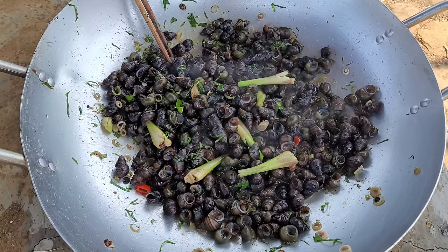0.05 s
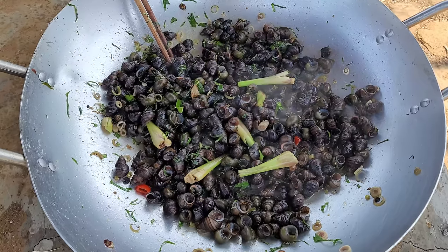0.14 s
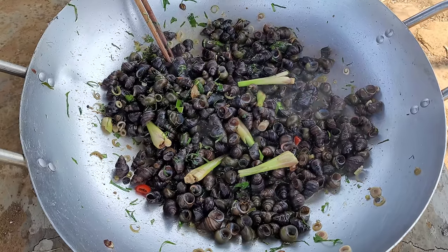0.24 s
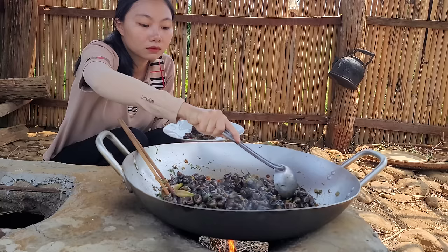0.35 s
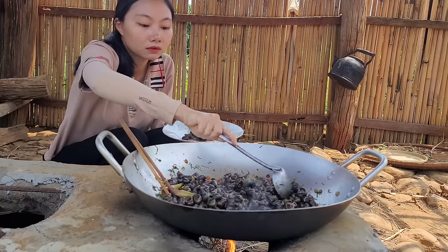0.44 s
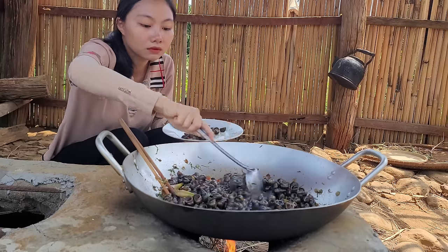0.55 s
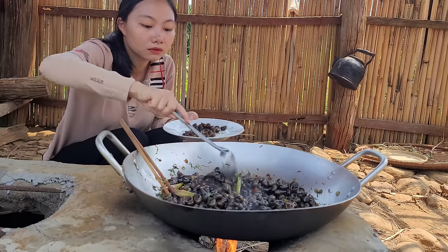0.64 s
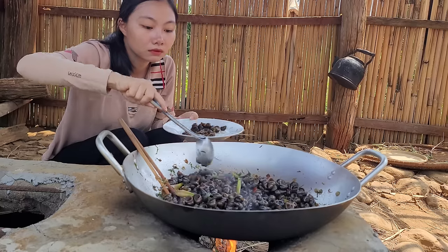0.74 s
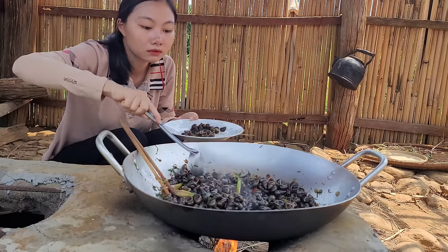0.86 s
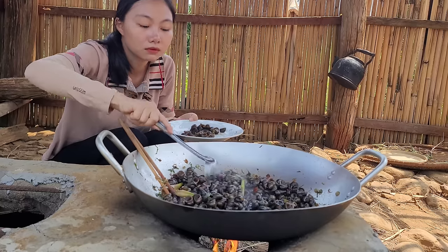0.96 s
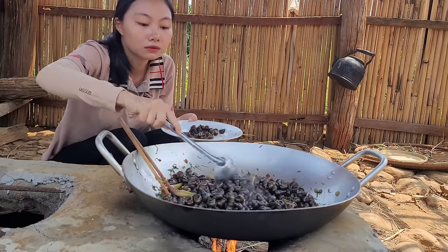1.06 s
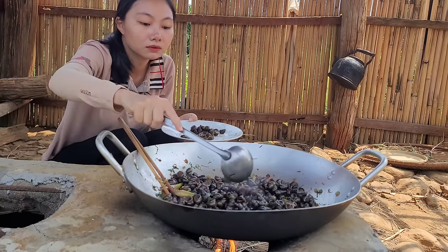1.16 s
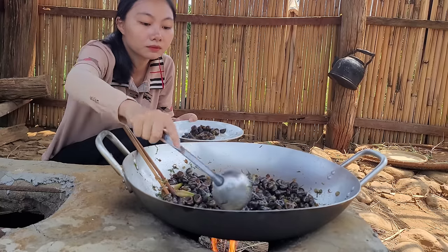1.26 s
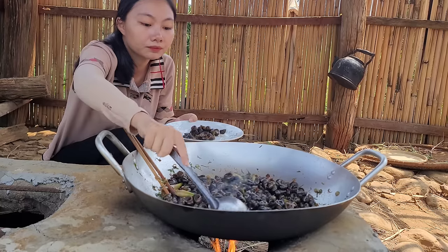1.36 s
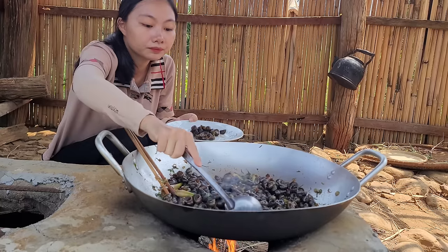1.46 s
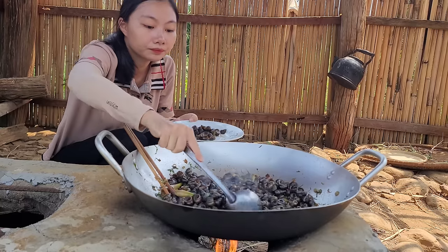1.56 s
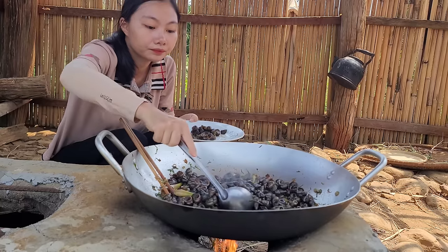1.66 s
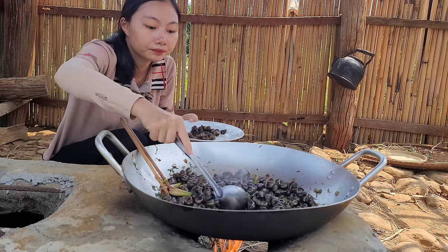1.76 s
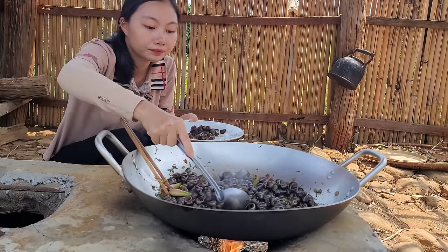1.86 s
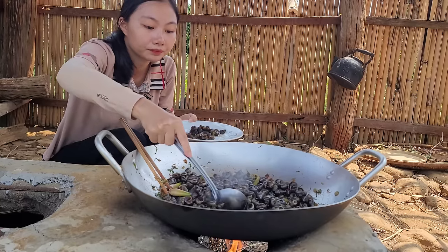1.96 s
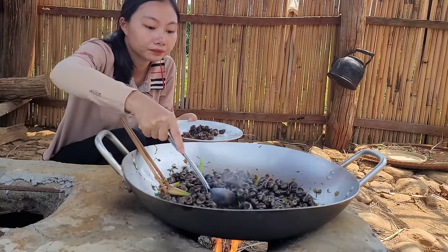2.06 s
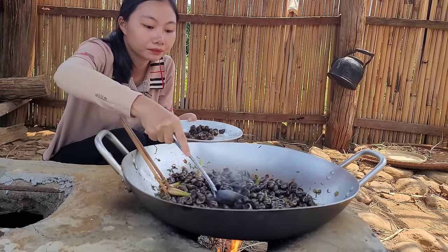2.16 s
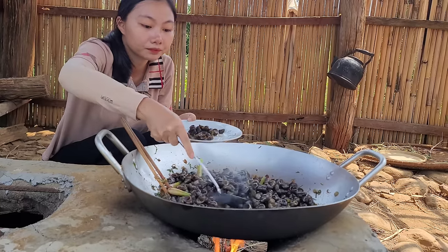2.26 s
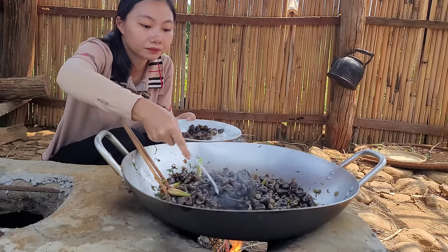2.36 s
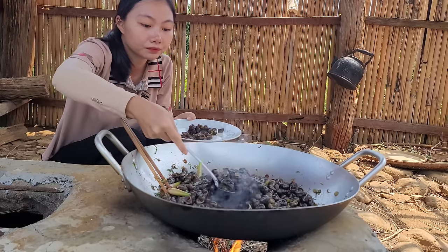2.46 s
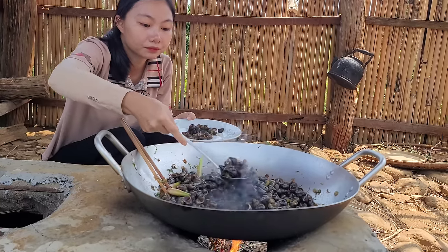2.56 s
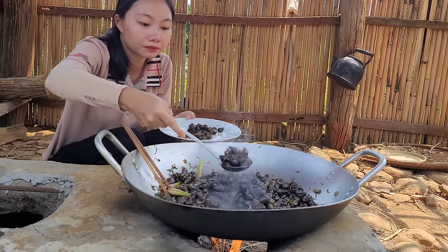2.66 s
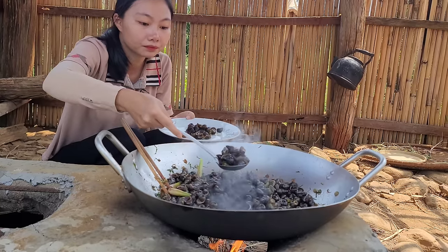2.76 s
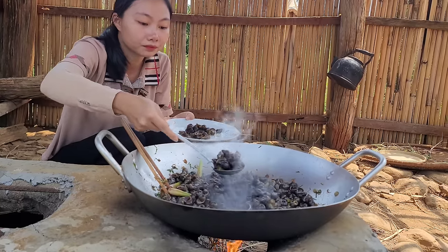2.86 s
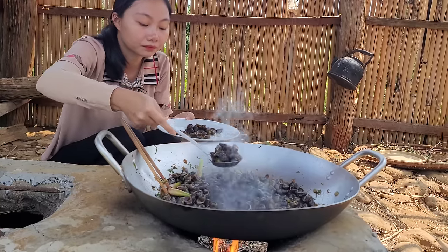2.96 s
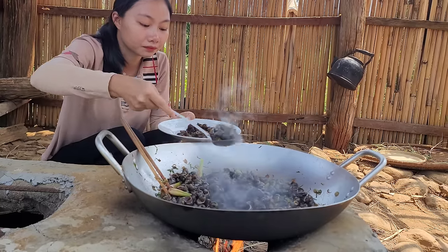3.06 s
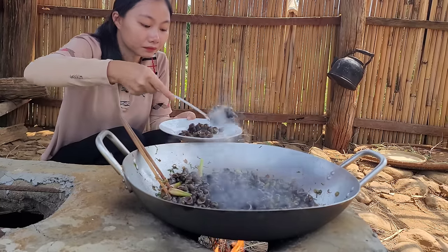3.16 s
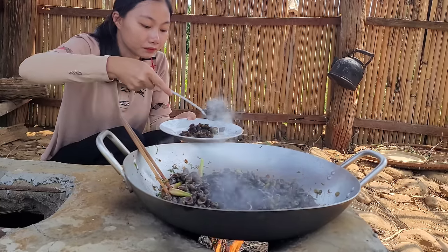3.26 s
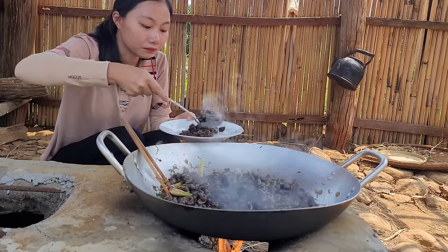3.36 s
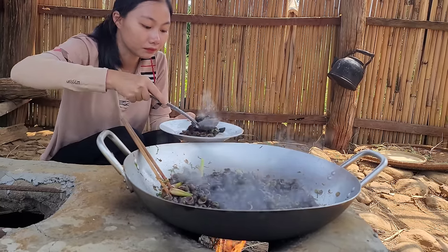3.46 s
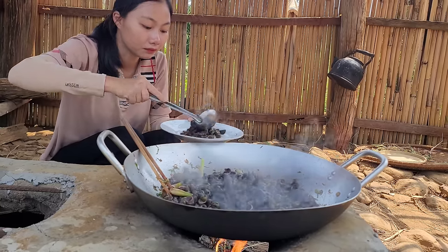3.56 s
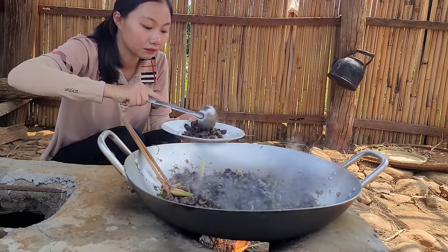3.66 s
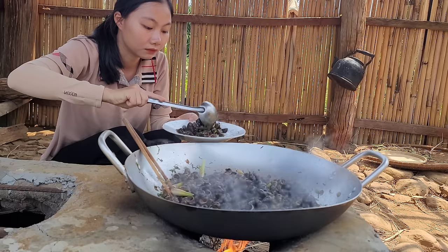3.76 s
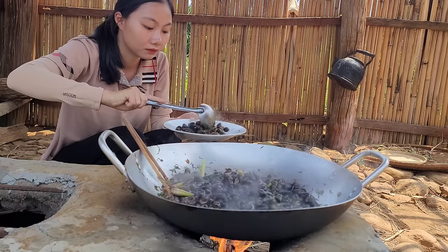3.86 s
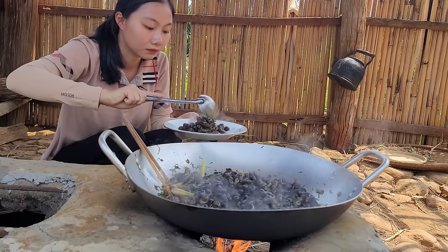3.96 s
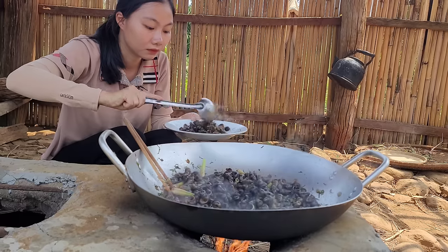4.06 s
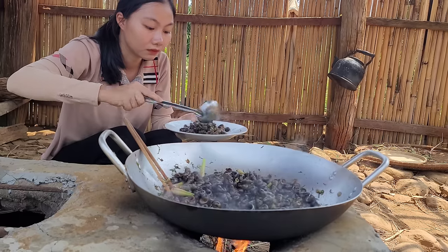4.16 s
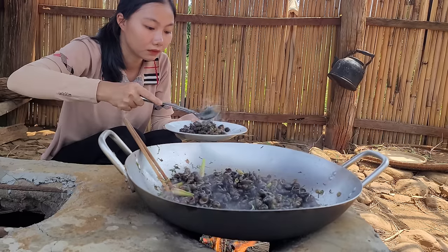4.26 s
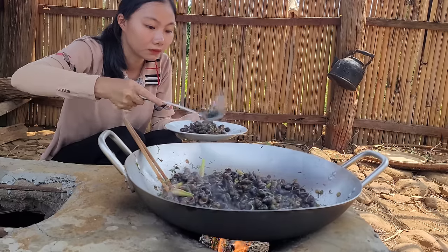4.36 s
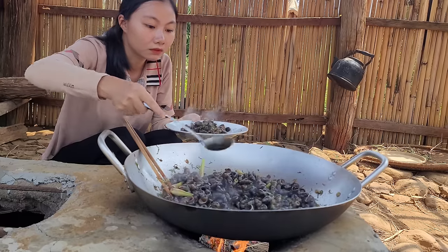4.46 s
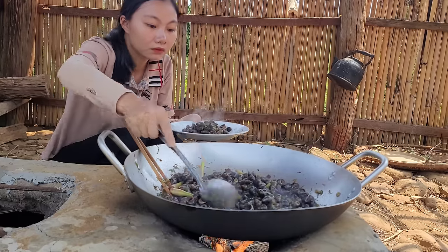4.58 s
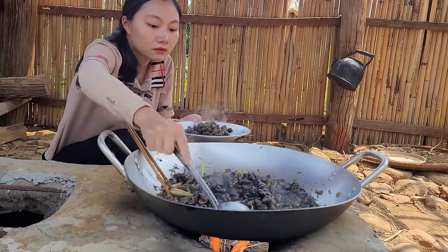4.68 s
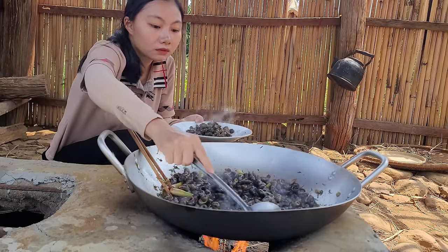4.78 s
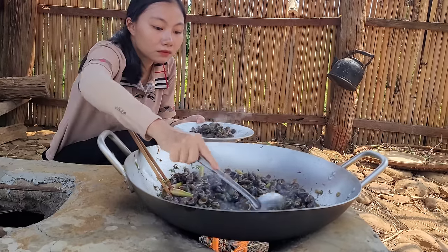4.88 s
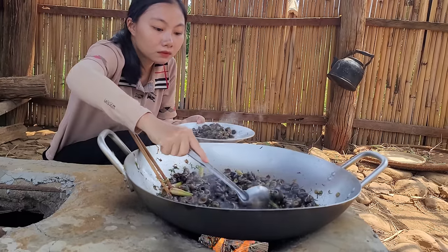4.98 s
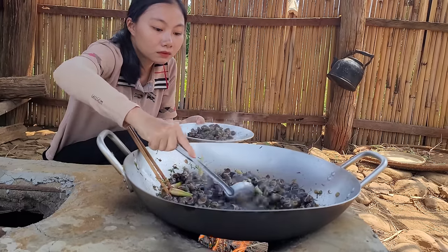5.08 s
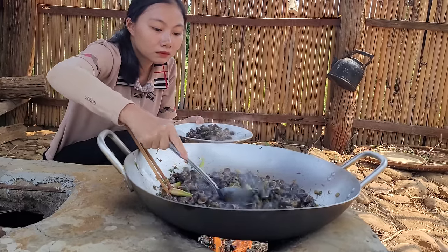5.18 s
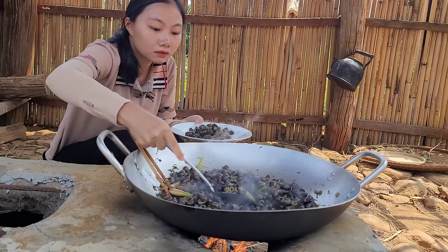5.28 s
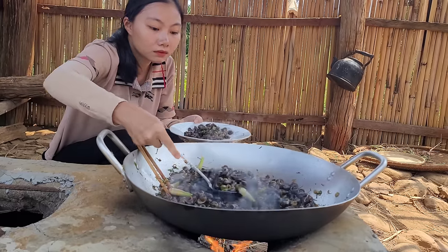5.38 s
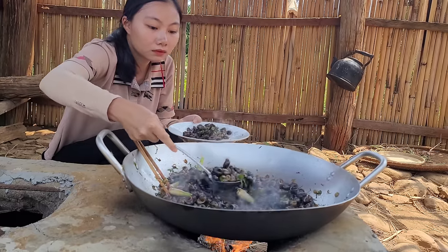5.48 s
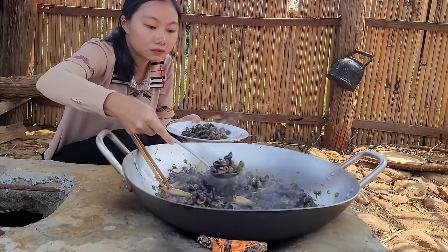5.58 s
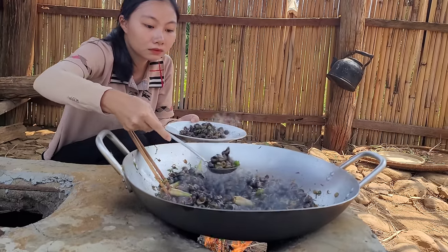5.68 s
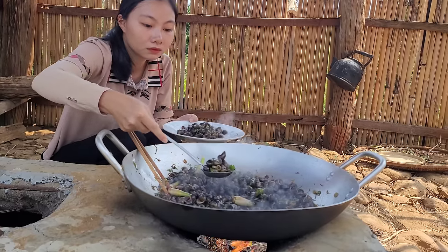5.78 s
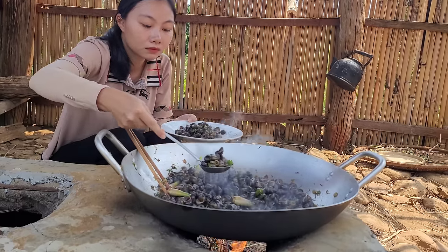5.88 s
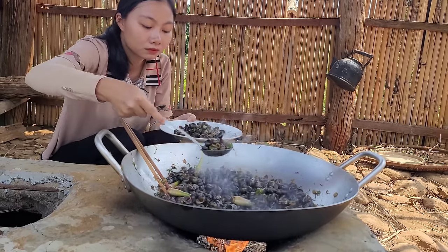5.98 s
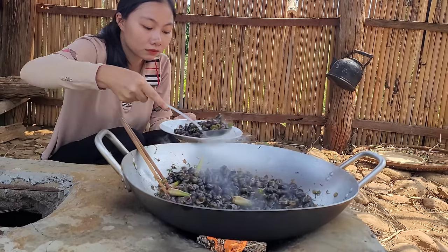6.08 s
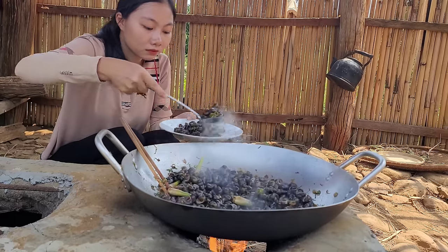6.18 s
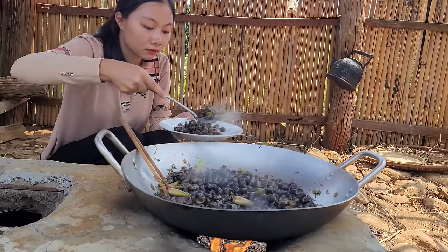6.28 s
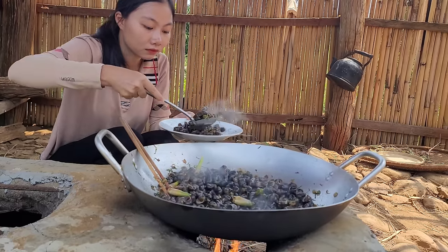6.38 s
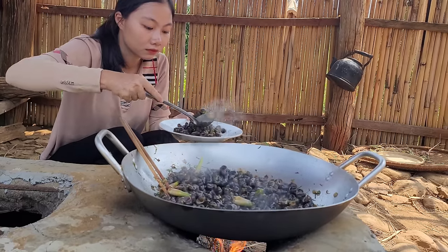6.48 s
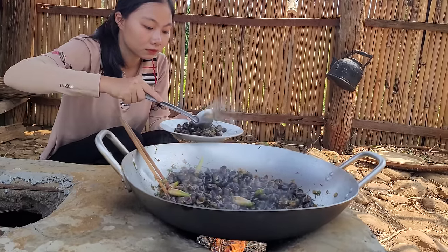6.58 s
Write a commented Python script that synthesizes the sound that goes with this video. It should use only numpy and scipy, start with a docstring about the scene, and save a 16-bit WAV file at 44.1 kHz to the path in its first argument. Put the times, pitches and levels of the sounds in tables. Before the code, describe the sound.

A metal ladle clacks and scrapes through snail shells in a sizzling wok, then tips them tinkling onto a plate.

```python
"""Snail shells in a wok over an open fire.

In a yard, a steel ladle digs twice through cooked snail shells and tips them onto a plate. Shells click
on the metal and rustle against each other, the ladle knocks on the wok, the plate tinkles. Underneath,
the fire rumbles and the pan sizzles and simmers faintly. The right microphone is nearer the wok; the
left one is muffled and a little farther away."""
import sys
import numpy as np
from scipy import signal
from scipy.fft import rfft, irfft, next_fast_len
from scipy.io import wavfile

SR = 44100
rng = np.random.default_rng(int(sys.argv[2]) if len(sys.argv) > 2 else 0)


def wrap_up_sound(samples):
    """Save the sound to the file named by the first command line argument, as 16-bit audio."""
    columns = np.atleast_2d(samples).T
    # keep every value between -1 and 1, then stretch to whole-number steps
    tamed = np.clip(columns, -1, 1)
    steps = np.round(tamed * 32767).astype(np.int16)
    wavfile.write(sys.argv[1], SR, steps)


N = 292383
TIME = np.arange(N) / SR
RING_SAMPLES = 8192

# resonances of the wok: (frequency [Hz], width [Hz], lift [dB])
WOK_MODES = [(180.4, 34, 13), (402, 21, 4.5), (636, 100, 7), (1051, 33, 7.5), (1230, 200, 0.5),
             (2110, 220, 2.5), (2360, 23, 6), (3010, 310, 5.5), (3694, 25, 10), (4200, 34, 5),
             (4540, 380, 6), (4840, 144, 5.5), (6280, 280, 5.5), (6680, 400, 4.5), (9040, 62, 2),
             (9220, 700, 7.5), (12120, 2300, 7.5)]
# the ladle pushes through the heap: (start [s], length [s], relative rustle [dB], grinding [dB])
PUSHES = [(0.551, 0.082, -34, -37), (0.665, 0.04, -40, -43), (0.876, 0.18, -37, -40),
          (1.48, 0.077, -38, -39), (1.63, 0.049, -39, -38.5), (1.786, 0.022, -43.5, -41.5),
          (2.037, 0.2, -43.5, -45.5), (2.22, 0.11, -39, -44.5), (2.58, 0.091, -41, -45),
          (2.751, 0.043, -43.5, -50), (4.802, 0.048, -47.5, -54), (4.874, 0.16, -39.5, -44),
          (5.059, 0.18, -38, -41.5), (5.334, 0.1, -43, -55), (5.603, 0.14, -43, -48)]


def from_db(db):
    """Decibels to gain."""
    return 10 ** (np.asarray(db) / 20)


def rms_one(x):
    """Scale to unit rms."""
    return x / np.sqrt(np.mean(x ** 2) + 1e-20)


def level(rows):
    """Gain in time from rows of (time [s], level [dB])."""
    return from_db(np.interp(TIME, *np.transpose(rows)))


def drift(turns_per_s):
    """Random wandering with a spread of about 1."""
    knots = rng.standard_normal(2048)
    return np.interp(TIME * turns_per_s, np.arange(len(knots)), knots)


def colour(x, points, modes=()):
    """Causal (minimum-phase) filter: a smooth spectrum with resonances standing on it."""
    size = next_fast_len(x.shape[-1] // 2 + 1024, True) * 2
    f = np.arange(size // 2 + 1) * SR / size
    hz, db = np.transpose(points)
    curve_db = np.interp(np.log(f + 1), np.log(hz), db)
    for centre, width, lift in modes:
        curve_db += lift / (1 + (2 * (f - centre) / width) ** 2)
    cepstrum = irfft(np.log(from_db(curve_db)))
    cepstrum[1:size // 2] *= 2
    cepstrum[size // 2 + 1:] = 0
    return irfft(rfft(x, size) * np.exp(rfft(cepstrum)), size)[..., :x.shape[-1]]


def pair(size, alike, bass_alike=0.81):
    """White noise at two microphones, with one likeness for the treble and one for the bass."""
    fft_size = next_fast_len(size, True)
    f = np.arange(fft_size // 2 + 1) * SR / fft_size
    likeness = np.clip(np.interp(f, [1200, 2400], [bass_alike, alike]), 0, 1)
    shared, *own = rfft(rng.standard_normal((3, fft_size)))
    spectra = np.sqrt(likeness) * shared + np.sqrt(1 - likeness) * np.array(own)
    return irfft(spectra, fft_size)[:, :size]


def contact(crack_t60, tail_t60, tail_db, alike, rise_s=0.00029):
    """One blow: dense modes that die fast in the heap, then a diffuse tail from bowl and walls."""
    t = TIME[:RING_SAMPLES]
    crack = pair(RING_SAMPLES, alike) * np.exp(-np.log(1000) * t / crack_t60)
    tail = pair(RING_SAMPLES, alike / 2) * np.exp(-np.log(1000) * t / tail_t60)
    return (crack + from_db(tail_db) * tail) * (1 - np.exp(-t / rise_s))


def add(out, start_s, sound):
    """Mix a sound in at a time."""
    start = max(round(start_s * SR), 0)
    out[:, start:start + sound.shape[1]] += sound[:, :max(N - start, 0)]


def grains(per_s, spread_db, crack_t60, tail_db, ring_db=-1.5, count=10):
    """Random contacts of uneven strength, dealt to several bodies that each have their own colour."""
    born = rng.random(N) < per_s * from_db(1.8 * drift(35)) / SR
    strength = from_db(spread_db * np.minimum(rng.exponential(1, N), 3.5))
    clicks = born * strength * rng.choice([-1, 1], N)
    dealt = rng.integers(0, count, N)
    out = np.zeros((2, N))
    for k, hz in enumerate(np.geomspace(1500, 8000, count)):
        tick = contact(crack_t60, tail_t60=0.12, tail_db=tail_db, alike=0.29)
        body = colour(tick, [(hz, 0)], [(hz, hz / 5, ring_db)])
        out += signal.oaconvolve([clicks * (dealt == k)], body, axes=1)[:, :N]
    return rms_one(out)


def struck_at_random(modes, spot_db):
    """Each spot of contact rings the modes in its own proportions."""
    return [(hz, width, lift + spot_db * rng.standard_normal()) for hz, width, lift in modes]


def push(start, length, attack_s=0.045, sag_db_per_s=8.5):
    """Effort of one push: it swells, sags while it lasts and stops; the heap settles more quietly."""
    release_db_per_s, settle_db, settle_db_per_s = 235, -5, 36
    t = TIME - start
    after = np.maximum(t - length, 0)
    rise = np.clip(1 + t / attack_s, 0, 1) ** 2
    fall_db = np.maximum(-release_db_per_s * after, settle_db - settle_db_per_s * after)
    return rise * from_db(fall_db - sag_db_per_s * np.clip(t, 0, length))


def fire(gain_db=4.0, flutter_db=1.8):
    """The flames under the wok rumble and flutter, much alike at both microphones."""
    # strength of the fire: (time [s], relative level [dB])
    blaze = [(0, -40), (0.35, -51.5), (0.47, -42), (0.58, -53), (4.4, -53.5), (6.63, -55.5)]
    # spectrum of the rumble: (frequency [Hz], gain [dB])
    fire_colour = [(15, -30), (30, -11.5), (55, -2.5), (100, -2.5), (170, -4), (250, -14), (350, -28),
                   (1000, -44)]
    rumble = rms_one(colour(pair(N, alike=0.75, bass_alike=0.75), fire_colour))
    return level(blaze) * from_db(gain_db + flutter_db * drift(20)) * rumble


def sizzle():
    """The hot pan sizzles in thousands of tiny bursts a second."""
    # strength of the sizzle: (time [s], level [dB])
    sizzling = [(0, -90), (0.45, -56), (0.6, -41), (1.9, -58), (3.1, -51), (4.5, -53.5), (5.95, -51.5),
                (6.25, -52.5), (6.63, -51)]
    # spectrum of the bursts: (frequency [Hz], gain [dB])
    sizzle_colour = [(300, -23), (1500, 1), (3400, 0.5), (5500, 2.5), (8000, -3), (10500, 0), (12500, -1),
                     (15000, -9.5)]
    bursts = grains(per_s=5000, spread_db=6.0, crack_t60=0.0025, tail_db=-19.5)
    hiss = colour(bursts, sizzle_colour, modes=[(9600, 190, 5.9), (4570, 190, 4.8)])
    return level(sizzling) * rms_one(hiss)


def simmer():
    """A simmering hiss, loudest in the first half second, then faint."""
    # strength of the simmer: (time [s], relative level [dB])
    simmering = [(0, -46.5), (0.48, -44.5), (0.7, -56.5), (6.63, -53)]
    # spectrum of the simmer: (frequency [Hz], gain [dB])
    simmer_colour = [(200, -21.5), (450, 3.5), (750, -13), (1400, -4.5), (1720, 1.5), (2400, -7.5),
                     (3100, 8), (3600, 6), (4400, -8.5), (7000, -18.5), (14000, -69)]
    return level(simmering) * rms_one(colour(pair(N, alike=0.78), simmer_colour))


def yard_air(gain_db=-54.5):
    """The yard hisses evenly around the microphones."""
    # spectrum of the yard: (frequency [Hz], gain [dB])
    air_colour = [(100, 3.5), (350, 2.5), (650, 7), (770, 2.5), (1000, 7), (1300, -4), (1750, -5),
                  (2500, 1.5), (3500, 0.5), (4500, -7.5), (7000, -5), (15000, -43)]
    noise = pair(N, alike=0.47, bass_alike=0.5)
    hiss = colour(noise, air_colour, modes=[(1140, 86, 4.1), (2025, 240, 8.3)])
    return from_db(gain_db) * rms_one(hiss)


def bumps_and_knocks(focus_db=6.0, ringing=1.18):
    """Soft low bumps and pops at the start, then dull knocks on the wok; each favours one pitch."""
    # bumps, pops and knocks: (time [s], peak level [dB], favoured pitch [Hz])
    thuds = [(0.017, -27, 1150), (0.222, -29.5, 150), (0.4461, -30, 975), (0.9369, -20.5, 1020),
             (1.379, -24, 1060), (1.413, -25, 311), (1.464, -25, 593), (1.637, -29, 633), (1.653, -24, 300),
             (1.666, -27.5, 620), (4.77, -26, 2040), (4.777, -29.5, 920), (5.101, -33, 1200),
             (5.256, -26, 1230), (5.406, -33, 1400)]
    # their dull spectrum: (frequency [Hz], gain [dB])
    thud_colour = [(40, -2), (150, -2.5), (300, 6.5), (600, 1), (1200, 0.5), (2000, 3.5), (4000, -58),
                   (12000, -86)]
    modes = [(hz, width, ringing * lift) for hz, width, lift in WOK_MODES]
    out = np.zeros((2, N))
    for start, db, hz in thuds:
        focus = [(hz / 2, 0), (hz, focus_db), (hz * 2, -3), (hz * 5, -14)]
        burst = contact(crack_t60=0.026, tail_t60=0.16, tail_db=-16, alike=0.34)
        thud = colour(colour(burst, focus), thud_colour, modes)
        add(out, start, from_db(db) * thud / np.abs(thud).max())
    return colour(out, [(10, -20), (40, 0)])  # low cut


def clacks(ring_db=7.5, ring_width_hz=450):
    """Shells and ladle chatter on the wok: hard contacts are bright, heavy ones have more body."""
    # loud blows: (time [s], relative level [dB], body [dB], top [dB], ring of ladle or shell [Hz])
    blows = [(0.4897, -24, 5.5, -0.5, 4240), (0.5867, -13.5, 0, 5, 4870), (0.6239, -23, 15, 10, 4630),
             (0.694, -22, 4.5, -9, 2460), (0.7939, -18, 6, -10, 4800), (0.8214, -23, -4, -18, 4870),
             (0.8584, -24, 6, -14, 4840), (0.8754, -9, 2.5, -6, 4870), (0.907, -10.5, -4, 1.5, 4540),
             (0.9206, -10.5, -5, 2.5, 4560), (0.966, -15, -24, 7.5, 4540), (1.0635, -18, -0.5, -0.5, 4180),
             (1.142, -24, 2, 1.5, 6600), (1.2373, -23, 5.5, -17, 4540), (1.2922, -16.5, 5, -1, 6100),
             (1.333, -13.5, -3, 3.5, 6150), (1.412, -26.5, 15.5, -5, 2720), (1.4658, -19.5, 10, 10.5, 1680),
             (1.547, -21.5, -9, -2.5, 4450), (1.679, -23, 6, 0, 2840), (1.8173, -25, 6, 4.5, 2650),
             (2.1201, -22, 7, -7, 3960), (2.1402, -17, 0.5, -1.5, 2820), (2.288, -18.5, -3, 2, 3250),
             (2.3243, -17, 5, -3, 2880), (2.6144, -21, 9, 3.5, 1680), (2.6613, -14, 1, 3, 4730),
             (2.7839, -28.5, -12, 6.5, 4700), (2.887, -28, 6, -6, 4470), (4.8832, -23, -2, 1, 4570),
             (4.8961, -22, -6, 5, 6440), (5.176, -26.5, 3, 5, 4110), (5.2247, -21.5, 5.5, -17, 3000),
             (5.2531, -12, 4, -0.5, 4160), (5.3344, -20, 3.5, 3, 4540), (5.4078, -18.5, 7.5, -29, 2070),
             (5.5073, -22, 1.5, 2, 4200), (5.6371, -22.5, 1, 1.5, 4550), (5.675, -17.5, 4, 0, 4570),
             (5.6937, -16, 6, -2.5, 2000), (5.733, -27, 8, 4, 2410), (5.8846, -33.5, 7, 3, 4570)]
    # each blow has a faint lead-in just before it, the hit and a rebound: (delay [s], gain [dB])
    parts = [(-0.0035, -28), (0, -1.5), (0.0045, -11.5)]
    # spectrum of the usual blow: (frequency [Hz], gain [dB])
    clack_colour = [(80, -20.5), (300, -12), (700, -10.5), (1300, -1), (2500, -0.5), (5000, 3.5),
                    (7800, -2), (12500, -8.5), (15000, -14)]
    out = np.zeros((2, N))
    for start, db, body_db, top_db, ring_hz in blows:
        tilt = [(1400, body_db), (3000, 0), (6000, 0), (9000, top_db)]
        modes = struck_at_random(WOK_MODES, spot_db=0.91) + [(ring_hz, ring_width_hz, ring_db)]
        for delay, part_db in parts:
            burst = contact(crack_t60=0.019, tail_t60=0.09, tail_db=-11.5, alike=0.49)
            add(out, start + delay, from_db(db + part_db) * colour(burst, tilt, modes))
    return colour(out, clack_colour)


def stirring(rustle_db=3.5, clicks_db=-38.5, clicks_follow=0.9):
    """Shells tumble ahead of the ladle and grind on the steel under it; loose ones click and settle."""
    # spectra of tumbling, grinding and loose shells: (frequency [Hz], gain [dB])
    rustle_colour = [(200, -46), (900, 4), (2000, 6.5), (4000, 3), (7500, -1), (12500, -10), (15000, -10.5)]
    grind_colour = [(60, -28), (200, -1), (420, 8.5), (800, 2.5), (1200, 0), (2000, -3.5), (4000, 3.5),
                    (12000, -63)]
    loose_colour = [(200, -20), (700, -6.5), (1300, 5), (2500, -4), (5000, 4.5), (8000, -2), (13000, -3),
                    (15000, -12)]
    rubs = grains(per_s=380, spread_db=4.2, crack_t60=0.017, tail_db=-9)
    scrapes = grains(per_s=1400, spread_db=2.8, crack_t60=0.035, tail_db=-7)
    ticks = grains(per_s=45, spread_db=0.78, crack_t60=0.012, tail_db=-12.5, ring_db=6.5)
    rustle = rms_one(colour(rubs, rustle_colour, WOK_MODES))
    grind = rms_one(colour(scrapes, grind_colour, WOK_MODES))
    clicks = rms_one(colour(ticks, loose_colour, WOK_MODES))
    tumbling = pressing = np.zeros(N)
    for start, length, tumble_db, press_db in PUSHES:
        effort = push(start, length)
        tumbling = np.maximum(tumbling, from_db(tumble_db) * effort)
        pressing = np.maximum(pressing, from_db(press_db) * effort)
    loose = from_db(clicks_db) * (tumbling / tumbling.max()) ** clicks_follow
    return from_db(rustle_db) * tumbling * rustle + pressing * grind + loose * clicks


def skid(skid_db=-36.5, sing_hz=13300, width_hz=1000, sing_db=15.0):
    """In the first push the rim skids over bare steel; its slips feed a high resonance of the ladle."""
    start, length = PUSHES[0][:2]
    slips = grains(per_s=900, spread_db=2.9, crack_t60=0.0067, tail_db=-26)
    singing = colour(slips, [(500, -20), (3000, 6)], [(sing_hz, width_hz, sing_db)])
    return from_db(skid_db) * push(start, length) ** 2 * rms_one(singing)


def plate(shell_db=7.0, shell_width_hz=800, hop_s=(0.007, 0.018), hop_loss_db=8):
    """Each falling shell rings briefly, sets the plate's modes going, hops and lands more softly."""
    # shells dropping on the plate: (time [s], relative level [dB], the shell's own ring [Hz])
    drops = [(3.4726, -23.5, 5800), (3.5724, -35, 9800), (3.5827, -22.5, 9800), (3.634, -35.5, 5600),
             (3.736, -26.5, 3500), (3.768, -24, 4970), (3.8147, -29, 3300), (3.8273, -27, 8940),
             (3.8446, -28.5, 5500), (3.8612, -20, 9700), (3.8739, -27.5, 4960), (3.9126, -29, 5110),
             (3.954, -28, 5000), (4.057, -30.5, 6220), (4.075, -26, 5700), (4.165, -34.5, 9400),
             (6.4935, -31.5, 5500), (6.5567, -26.5, 3000)]
    # resonances of the plate: (frequency [Hz], width [Hz], lift [dB])
    plate_modes = [(2034, 62, 11.7), (3380, 190, 14), (3620, 33, 7.5), (4500, 64, 7), (5100, 160, 11.3),
                   (5494, 104, 15), (6500, 430, 10), (7090, 240, 9.3), (7320, 110, 17), (9040, 130, 20),
                   (9500, 170, 13), (9770, 210, 15), (10400, 90, 8.3), (12700, 400, 7)]
    # spectrum of the tinkle: (frequency [Hz], gain [dB])
    plate_colour = [(200, -14), (1000, -8), (2500, -1), (5000, 0.5), (8000, -6.5), (12000, -6),
                    (15000, -13)]
    out = np.zeros((2, N))
    for start, db, shell_hz in drops:
        shell_mode = (shell_hz, shell_width_hz, shell_db)
        for delay, loss_db in ((0, 0), (rng.uniform(*hop_s), hop_loss_db)):
            modes = struck_at_random(plate_modes, spot_db=2.0) + [shell_mode]
            landing = contact(crack_t60=0.01, tail_t60=0.1, tail_db=-12, alike=0.45)
            clink = colour(landing, [(shell_hz, 0)], modes)
            add(out, start + delay, from_db(db - loss_db) * clink)
    return colour(out, plate_colour)


def farther(left):
    """The treble reaches the left microphone later; long waves reach both nearly together."""
    # lag at the left microphone: (frequency [Hz], delay [s])
    left_lag = [(750, -0.00003), (1200, 0.00015), (1700, 0.00024), (2500, 0.00038), (6000, 0.00046),
                (16000, 0.00049)]
    size = next_fast_len(N + RING_SAMPLES, True)
    f = np.arange(size // 2 + 1) * SR / size
    lag_s = np.interp(f, *np.transpose(left_lag))
    return irfft(rfft(left, size) * np.exp(-2j * np.pi * f * lag_s), size)[:N]


def scene(left_lift_db=4.5):
    """The wok stands nearer the right microphone; simmer and yard air lean to the left."""
    foreground = clacks() + bumps_and_knocks() + stirring() + skid() + plate()
    lean_left = from_db([[left_lift_db], [0]])
    background = fire() + sizzle() + lean_left * (simmer() + yard_air())
    left, right = foreground + background
    return np.array([farther(left), right])


def record(dry, opens_s=(0.878, 0.895), cutoff_hz=15500):
    """The left microphone is muffled; on both, the treble starts hollow, then opens; the top is cut."""
    # responses of the muffled left port and of the hollow opening: (frequency [Hz], gain [dB])
    left_colour = [(50, 0.5), (350, -1), (600, -5), (850, 3), (1170, 4), (1800, 0.5), (2700, -7.5),
                   (3700, -15), (4400, -17.5), (5200, -15.5), (6400, -22), (8800, -41.5), (9600, -45),
                   (10300, -34), (11800, -24.5), (15000, -8.5)]
    hollow_colour = [(3500, -3), (6800, -6.5), (7600, -17), (8500, -23), (9700, -32), (10400, -11),
                     (11800, -10), (13500, -1), (15000, 0)]
    heard = np.array([colour(dry[0], left_colour), dry[1]])
    opened = np.interp(TIME, opens_s, [0, 1])
    heard = opened * heard + (1 - opened) * colour(heard, hollow_colour)
    top_cut = signal.ellip(10, 0.2, 70, cutoff_hz, fs=SR, output="sos")
    return signal.sosfilt(top_cut, heard)


dry = scene()
out = record(dry)
wrap_up_sound(out)
```